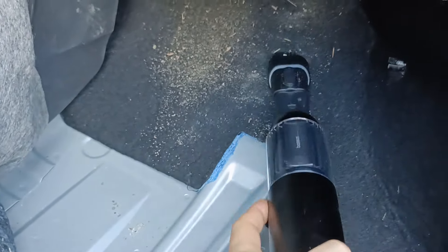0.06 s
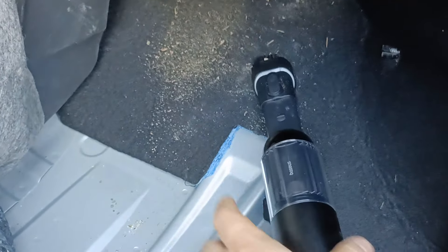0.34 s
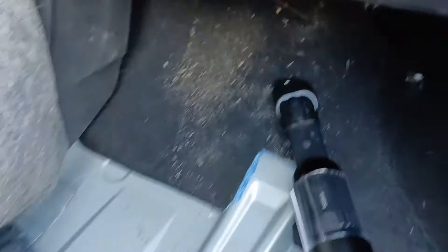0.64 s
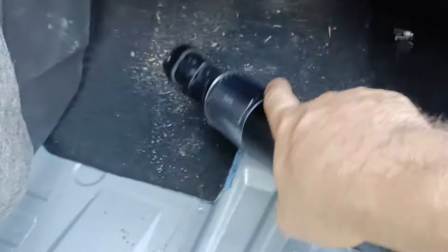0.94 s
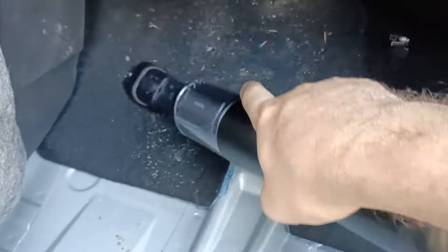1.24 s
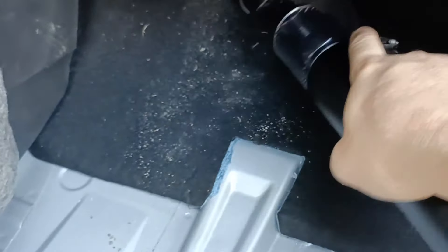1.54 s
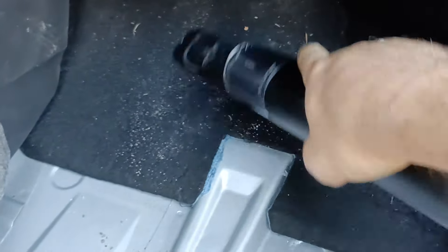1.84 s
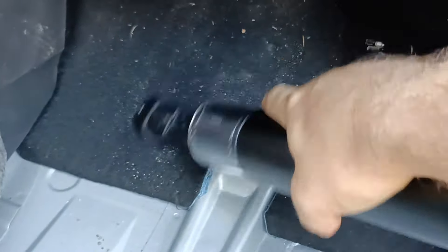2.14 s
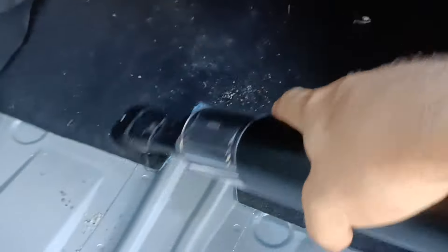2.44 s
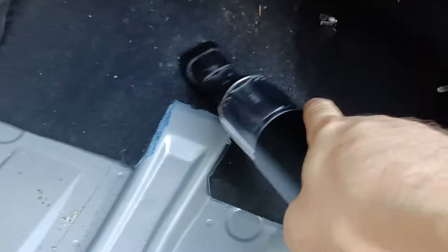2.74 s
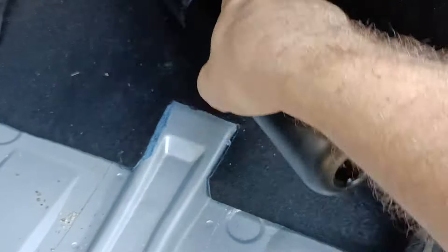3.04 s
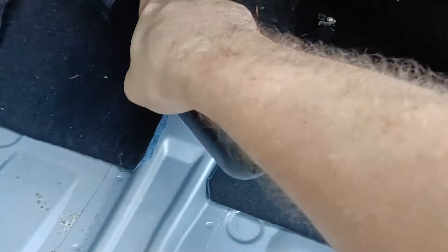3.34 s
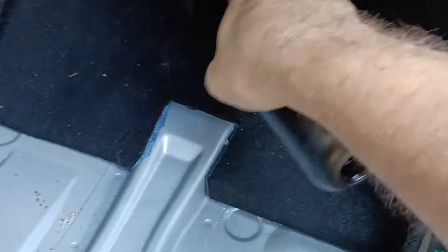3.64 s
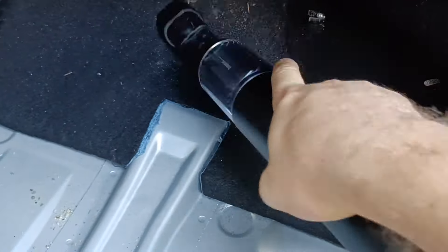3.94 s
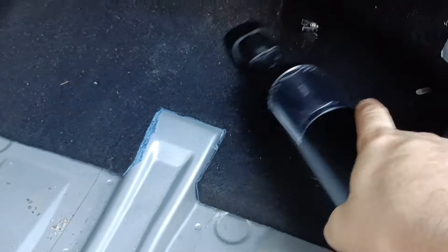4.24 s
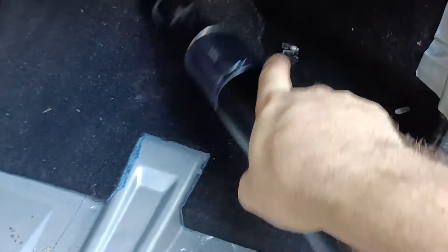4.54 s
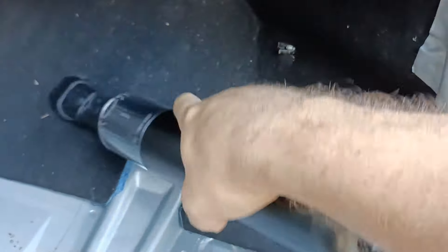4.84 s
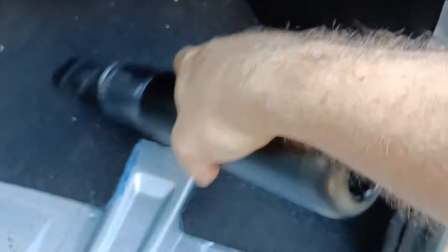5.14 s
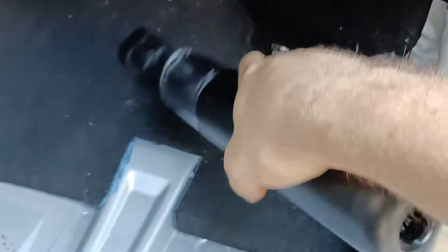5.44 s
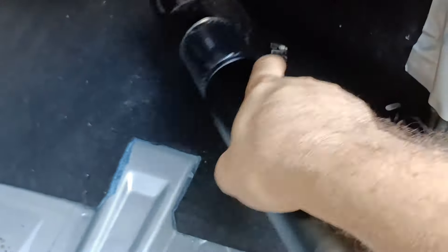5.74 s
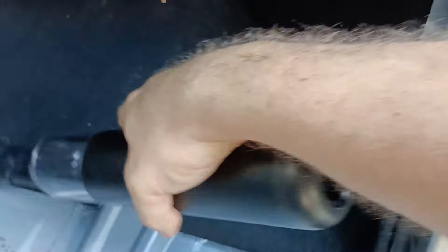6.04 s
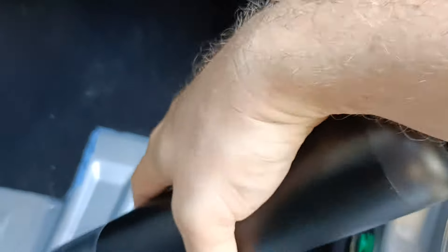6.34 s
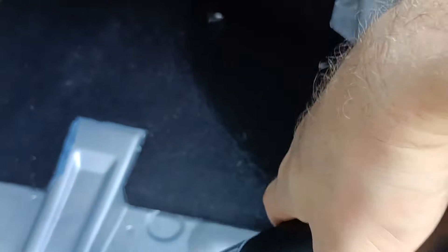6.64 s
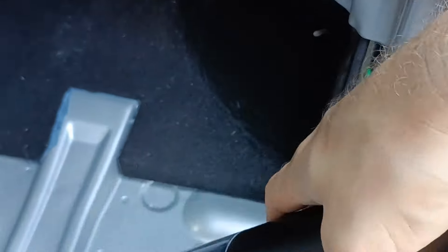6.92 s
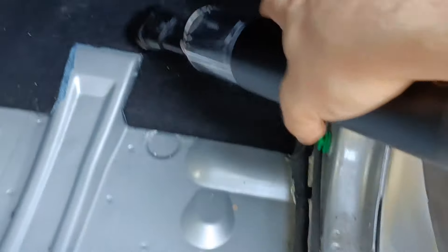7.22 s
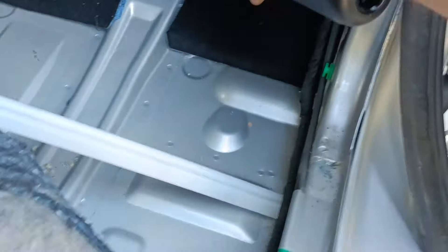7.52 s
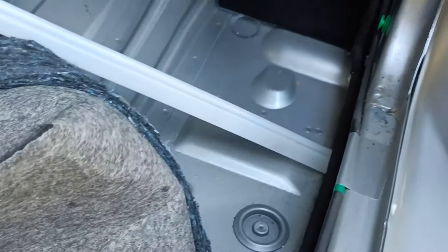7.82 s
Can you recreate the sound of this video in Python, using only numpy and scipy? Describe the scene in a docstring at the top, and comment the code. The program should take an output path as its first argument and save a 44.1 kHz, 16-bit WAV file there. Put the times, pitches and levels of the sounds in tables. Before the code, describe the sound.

Inside a car, a handheld vacuum whines without a break, hissing as its nozzle sweeps the floor carpet. A flurry of sandy ticks and two light bumps come early, and the ticking then thins out. The motor's pitch rises very slightly throughout. Later the plastic body knocks three times against the floor, the whine turns raspier, and the exhaust blows across the close microphone in its strongest gusts and pops.

```python
"""A small cordless vacuum works a car's floor carpet, close to the microphone. From the start its motor whines,
air rushes through the body, hisses at the nozzle and sounds the tube, and the exhaust sweeps the two microphone
ports in puffs and pops. Grit ticks up the tube from a dirty patch, then the nozzle taps the floor twice. The
wind eases through the middle as the whine creeps up in pitch. After five seconds come three harder knocks, the
strongest puffs and pops, and a rougher whine."""
import sys
import numpy as np
from scipy import signal
from scipy.fft import rfft, irfft, next_fast_len
from scipy.io import wavfile
from scipy.ndimage import uniform_filter1d, map_coordinates

SR = 44100
rng = np.random.default_rng(int(sys.argv[2]) if len(sys.argv) > 2 else 0)


def log_audio(samples):
    """Write samples as a 16-bit WAV file to the path given in sys.argv[1]."""
    # one column per channel
    frames = np.atleast_2d(samples).T
    # limit to full scale, then quantise
    limited = np.clip(frames, -1, 1)
    pcm = np.round(limited * 32767).astype(np.int16)
    wavfile.write(sys.argv[1], SR, pcm)


N = 347508
TIME = np.arange(N) / SR


def from_db(db):
    """Decibels to gain."""
    return 10 ** (np.asarray(db) / 20)


def unit_rms(x):
    """Scale to unit power."""
    return x / np.sqrt(np.mean(x ** 2) + 1e-20)


def automation(rows):
    """One curve over time for each column after a table's first."""
    times, *columns = np.transpose(rows)
    return [np.interp(TIME, times, column) for column in columns]


def at_hz(points, hz):
    """Read a spectrum on a log-frequency axis."""
    freqs, values = np.transpose(points)
    return np.interp(np.log(hz + 1), np.log(freqs), values)


def panned(pan_db):
    """Constant-power stereo gains; pan_db is left minus right."""
    gains = from_db(np.array([[.5], [-.5]]) * pan_db)
    return gains / np.sqrt(np.mean(gains ** 2, axis=0))


def filtered(x, hz, kind, order=2):
    """Butterworth filter."""
    sections = signal.butter(order, np.clip(hz, 10, SR / 2 - 1000), kind, fs=SR, output="sos")
    return signal.sosfilt(sections, x)


def drift(rate_hz):
    """Smooth random modulation with a spread of about 1."""
    knots = rng.standard_normal(2048)
    return map_coordinates(knots, [TIME * rate_hz * 2], order=3, mode="wrap")


def ring(clicks, hz, t60_s):
    """Each click sets a decaying sine ringing."""
    decay, step = from_db(-60 / (t60_s * SR)), 2 * np.pi * hz / SR
    return signal.lfilter([0, np.sin(step)], [1, -2 * decay * np.cos(step), decay ** 2], clicks + 1e-18)


def resonant_air(hz, width_hz, shared):
    """Stereo noise in one resonance that follows the curve hz; shared is the gain of a centre layer."""
    white = rng.standard_normal((3, len(hz))) + 1j * rng.standard_normal((3, len(hz)))
    eddies = filtered(filtered(white, width_hz / 2, "low", order=1), 0.6 * width_hz, "low")
    band = np.real(eddies * np.exp(2j * np.pi * np.cumsum(hz) / SR))
    return unit_rms(band[:2] + shared * band[2])


# The motor creeping up in speed: time_s, rotation_hz
MOTOR_SPEED = [(0, 3310), (.15, 3290), (1, 3296), (1.2, 3326), (2.38, 3343), (2.65, 3330), (3.5, 3363),
               (4, 3385), (4.5, 3394), (4.9, 3412), (5.02, 3430), (5.2, 3416), (5.9, 3438), (6.1, 3456),
               (6.25, 3430), (7.4, 3449), (7.88, 3480)]
# The whine's two harmonics as the body turns: time_s, first_db, second_db, pan_db
WHINE_MIX = [(0, -43.5, -43.5, 0), (.22, -42, -35.5, 8), (.3, -40, -41.5, 4), (.9, -36.5, -39.5, 0),
             (1.16, -50, -46, -4), (1.55, -45, -40, 0), (1.66, -43, -47.5, 2), (1.94, -45.5, -35.5, 3.5),
             (2.45, -46, -32, 6), (2.7, -43, -42, 4), (2.96, -42.5, -41.5, 1), (3.24, -52, -44.5, 1),
             (3.7, -48.5, -43, 1), (4.08, -42.5, -42, 4.5), (4.56, -42, -40, 2.5), (4.84, -43.5, -43, 8),
             (5.0, -50, -35, 4), (5.32, -46.5, -33, 1), (5.5, -44.5, -42, 4), (5.88, -40.5, -42, 3.5),
             (6.02, -53, -40, 6), (6.16, -46.5, -42, 4), (6.64, -46.5, -42.5, 3), (7.0, -47, -38.5, -4.5),
             (7.3, -43, -40.5, 0), (7.8, -52, -47, -2)]
# Rasp in the whine, growing as the vacuum is turned at the end: time_s, roughness (0-1)
WHINE_RASP = [(0, .3), (5.9, .55), (6.9, .75)]
def motor_whine(first_db, second_db, jitter_hz, waver_db, churn_width_hz, sway_rad):
    """Two harmonics of the rotor; churning air smears part of each into a rough band."""
    first, second, pan = automation(WHINE_MIX)
    hz, = automation(MOTOR_SPEED)
    rough, = automation(WHINE_RASP)
    rotor_phase = 2 * np.pi * np.cumsum(hz + jitter_hz * drift(25)) / SR
    out = np.zeros((2, N))
    for harmonic, level in ((1, first + first_db), (2, second + second_db)):
        churn = resonant_air(harmonic * hz, churn_width_hz, shared=.5) / np.sqrt(2)
        for side in range(2):
            sway = sway_rad * drift(1.287)  # the moving hand changes the path to each microphone
            tone = np.sqrt(1 - rough ** 2) * np.sin(harmonic * rotor_phase + sway) + rough * churn[side]
            out[side] += from_db(level + np.sqrt(harmonic) * waver_db * drift(11)) * tone
    return out * panned(pan)


# How alike the air is on both sides: frequency_hz, correlation (0-1)
AIR_CORRELATION = [(60, 1), (650, 1), (1400, 0.9), (2400, 0.79), (4400, 0.3), (7500, 0.77), (10000, 0)]
# Where each band of the air sits: frequency_hz, pan_db
AIR_PAN = [(500, 0.5), (2000, 0), (3000, 2), (4200, 2), (5200, 6.5), (6300, 8.5), (8000, 6), (10000, 5)]
def turbulence(spectrum):
    """Coloured air noise at two microphones: mono in the bass, wide at the top."""
    size = next_fast_len(N)
    hz = np.arange(size // 2 + 1) * SR / size
    mid, side = rfft(rng.standard_normal((2, size)))
    alike = np.clip(at_hz(AIR_CORRELATION, hz), -1, 1)
    pair = np.sqrt(1 + alike) * mid + np.sqrt(1 - alike) * side * [[1], [-1]]
    coloured = pair * from_db(at_hz(spectrum, hz)) * panned(at_hz(AIR_PAN, hz))
    return unit_rms(irfft(coloured, size)[:, :N])


# Fader rides for the air through the body: time_s, hiss_db, spray_db, pan_db
AIR_MIX = [(0.0, -43, -40.5, 0), (0.33, -43.5, -40.5, -2), (0.81, -42, -42, 3.5), (1.12, -39.5, -42, 1.5),
           (2.7, -42.5, -42, 2), (4.83, -42.5, -43, 3.5), (5.44, -42.5, -41, 4.5), (6.08, -40, -43, 4.5),
           (6.12, -42, -38.5, 3.5), (7.16, -39, -39.5, 0), (7.79, -44.5, -41.5, 3.5)]
# Tone curves of the dull rush, bright hiss and fine spray: frequency_hz, gain_db
RUSH_EQ = [(80, -15.5), (190, -4), (310, -9), (650, 2), (1000, 2.5), (1400, 2), (1900, -4), (2500, 0),
           (3200, -4), (5000, -23)]
HISS_EQ = [(1900, -50), (2500, -9), (3000, 2.5), (3350, 3), (3800, 1), (4400, -2), (5100, 0.8), (5800, 0),
           (6600, 3.5), (8000, -5.5), (10000, -40)]
SPRAY_EQ = [(6000, -30), (8300, 6.5), (10000, 3), (11700, 5), (12800, 3), (14000, 2.5), (15800, 0.5)]
def airflow(rush_db, hiss_db, spray_db, flutter_db, rush_follows_spray, housing_pan_db):
    """A dull rush from the exhaust, hiss from the fan housing and fine spray from the carpet pile."""
    hiss_ride, spray_ride, pan = automation(AIR_MIX)
    rush_ride = rush_follows_spray * (spray_ride - spray_ride.mean())
    rush = from_db(rush_ride + rush_db) * turbulence(RUSH_EQ)
    hiss = from_db(hiss_ride + hiss_db + flutter_db * drift(22)) * turbulence(HISS_EQ)
    spray = from_db(spray_ride + spray_db + flutter_db * drift(20)) * turbulence(SPRAY_EQ)
    treble = hiss + spray
    left_lag_s = 0.01 * (np.median(pan) - pan)  # moving right, it reaches the left microphone later
    treble[0] = map_coordinates(treble[0], [(TIME - left_lag_s) * SR], order=3)
    return rush + treble * panned(pan + housing_pan_db)


# The hissing gap between nozzle and carpet: time_s, pitch_hz, level_db, pan_db
NOZZLE_GAP = [(0, 7100, -39, 1), (.45, 7300, -39, 1), (.63, 7780, -31, 1), (.88, 7200, -35, 4),
              (.98, 7300, -45, -2), (1.75, 7500, -40.5, 5.5), (2.33, 7050, -36.5, -0.5),
              (2.6, 7200, -47, 0), (2.88, 7500, -38.5, 6), (3.3, 7300, -42.5, -2), (3.6, 7050, -38.5, 0),
              (3.8, 7500, -41, 5), (4.75, 7500, -42.5, 5), (5.0, 7150, -38, 5.5), (5.3, 7100, -35.5, 0),
              (5.45, 7200, -39.5, 0), (5.56, 7300, -34.5, 0), (5.7, 7500, -41.5, 3.5),
              (6.15, 7100, -39.5, 8), (7, 7400, -45.5, -3), (7.3, 7200, -44, 3), (7.52, 6600, -37, 10),
              (7.88, 7694, -42, 0)]
def nozzle_hiss(gain_db, width_hz, shared, flutter_db, rocking_hz):
    """Air tearing past the lip sounds a broad resonance that moves with the gap and flutters on the pile."""
    hz, level, pan = automation(NOZZLE_GAP)
    hz = hz + rocking_hz * drift(3)
    envelope = from_db(level + gain_db + flutter_db * drift(14))
    return envelope * resonant_air(hz, width_hz, shared) * panned(pan)


# Airy resonances of the intake tube: pitch_hz, width_hz, level_db
TUBE_MODES = [(5260, 1100, -1.5), (7595, 500, -3.5), (9628, 800, -10.5), (12800, 450, -7.5)]
# Their fader ride, stroke by stroke: time_s, level_db
TUBE_STROKES = [(0, -52), (.9, -50), (1.1, -44.5), (1.45, -46), (1.65, -48), (2.2, -44.5), (2.5, -43.5),
                (2.95, -41.5), (3.1, -55), (3.65, -50), (3.9, -42.5), (5.0, -42.5), (5.45, -46.5),
                (5.8, -44), (6.05, -43), (6.25, -58)]
def intake_tube(gain_db, shared, pan_db, flutter_db, follows_gap):
    """Freely drawn air sounds the tube's resonances; the gap at the lip bends their pitch."""
    level, = automation(TUBE_STROKES)
    gap_hz = automation(NOZZLE_GAP)[0]
    bend = (gap_hz / np.median(gap_hz)) ** follows_gap
    modes = sum(from_db(db + flutter_db * drift(6)) * resonant_air(hz * bend, width_hz, shared)
                for hz, width_hz, db in TUBE_MODES)
    return from_db(level + gain_db) * modes * panned(pan_db)


def grit(base_per_s, level_db, spread_db, t60_s, pitch_count=12):
    """Sand ticks on the tube, most thickly while the nozzle crosses the dirty patch at the start."""
    dirty_patch = np.exp(-((TIME - .65) / 0.21) ** 2)
    hits = rng.random(N) < base_per_s * (1 + 9 * dirty_patch) / SR
    grains = hits * from_db(level_db + spread_db * np.minimum(rng.exponential(1, N), 2.8))
    pitch_index = rng.integers(0, pitch_count, N)
    ticks = sum(ring(grains * (pitch_index == k), hz, t60_s) * panned(rng.normal(1, 3.6))
                for k, hz in enumerate(np.geomspace(5000, 14500, pitch_count)))
    return filtered(ticks, 3600, "high")


# A bed of exhaust wind, strong while the vacuum is held close: time_s, level_db
EXHAUST_DRAUGHT = [(0, -52), (.65, -55), (1.2, -59), (2.4, -62), (3.6, -68), (5.9, -67), (6.55, -47),
                   (7.1, -54), (7.6, -47)]
# The jet hitting the microphone: start_s, hold_s, level_db, pan_db
JET_PUFFS = [(0.038, 0.0044, -35, 7), (0.12, .015, -47, -7), (0.236, 0.08, -41, -3),
             (0.373, 0.0165, -38, -4), (0.489, 0.065, -44, 12), (0.77, 0.025, -41, -24),
             (1.029, .008, -46, -10), (1.35, 0.071, -38, -28), (1.465, 0.071, -43.5, -5),
             (1.809, 0.26, -47, -17.5), (2.908, 0.13, -56.5, -14), (3.106, .008, -53, -15),
             (4.4, 0.029, -69, -11.5), (4.646, 0.018, -47, -24), (4.92, 0.12, -51, -19),
             (5.281, 0.0071, -39, -2), (5.68, 0.12, -50, 24), (6.021, 0.16, -37, 22.5),
             (6.249, 0.12, -35, -15), (6.447, 0.048, -28.5, -21), (6.691, 0.038, -26.5, -21),
             (6.76, 0.023, -30, -19), (6.863, 0.014, -43.5, -2), (7.323, 0.039, -32.5, -20),
             (7.463, 0.009, -31.5, -14), (7.496, 0.072, -35, -20.5), (7.761, 0.012, -34, -23),
             (7.836, .03, -42.5, -8)]
def exhaust_wind(gain_db, low_hz, top_hz, edge_db, lumpy_db, gusty_db, pan_db, attack_s, release_s):
    """Eddies buffet each port on their own; a harder puff breaks into smaller, brighter eddies."""
    draught, = automation(EXHAUST_DRAUGHT)
    power = (from_db(draught + gusty_db * np.tanh(drift(7))) * panned(pan_db)) ** 2
    for start_s, hold_s, db, pan in JET_PUFFS:
        near = (TIME > start_s) & (TIME < start_s + .5)
        age = TIME[near] - start_s
        swell = np.minimum(age / attack_s, 1) * np.exp(-np.maximum(age - hold_s, 0) / release_s)
        power[:, near] += (from_db(db) * panned(pan) * swell) ** 2
    blow = np.sqrt(power)
    lumps = from_db(lumpy_db * np.array([[drift(60), drift(60)], [drift(51), drift(60)]]))
    large, small = filtered(rng.standard_normal((2, 2, N)) * lumps, low_hz, "high")
    thud = unit_rms(filtered(filtered(large, top_hz, "low", order=1), 424, "low"))
    edge = unit_rms(filtered(small, [400, 900], "band"))
    eddies = thud + from_db(edge_db) * (blow / blow.max()) ** 0.72 * edge
    eddies /= np.sqrt(uniform_filter1d(eddies ** 2, size=SR // 25, axis=1))  # blow alone sets the dynamics
    return from_db(gain_db) * blow * eddies


# Sharp wind pops on the microphone: start_s, level_db, pitch_hz, pan_db
EDDY_POPS = [(0.043, -34, 320, 8), (0.382, -35, 280, -14), (0.535, -33.5, 240, 23), (0.954, -39.5, 300, -4),
             (1.361, -33, 340, -22), (1.471, -31, 241, -23), (5.287, -36.5, 280, 0), (6.093, -34, 400, 19),
             (6.14, -27.5, 450, 21.5), (6.297, -32, 332, -19.5), (6.457, -21, 272, -19),
             (6.485, -34.5, 240, -11), (6.691, -29, 357, -15), (6.704, -20.5, 570, -28),
             (6.718, -33, 400, -20), (6.734, -30, 200, -26), (6.771, -24.5, 220, -22),
             (7.33, -34, 280, -16), (7.467, -29, 377, -7), (7.77, -31, 395, -21)]
def wind_pops(gain_db, rise_s, snap_db, snap_hz):
    """A single eddy bursts on a port: a swing or two of pressure with a short snap on top."""
    out = np.zeros((2, N))
    for start_s, db, hz, pan in EDDY_POPS:
        near = (TIME > start_s) & (TIME < start_s + .05)
        age = TIME[near] - start_s
        swell = age / rise_s * np.exp(1 - age / rise_s)
        thump = swell * np.sin(2 * np.pi * hz * age)
        noise = unit_rms(filtered(rng.standard_normal(len(age)), [snap_hz / 2, snap_hz], "band", order=1))
        snap = from_db(snap_db) * swell ** 2 * filtered(noise, snap_hz, "low")
        out[:, near] += from_db(db + gain_db) * (thump + snap) * panned(pan)
    return filtered(out, 74, "high")


# Passing swishes of air, and a faint low cabin hum that swells and fades:
# middle_s, length_s, pitch_hz, glide_either_side_hz, width_hz, level_db, pan_db
SWISHES_AND_HUM = [(0.11, 0.16, 5020, 400, 1300, -42.5, 4.5), (0.483, 0.65, 10000, -0.5, 3200, -42.5, -20),
                   (0.551, 0.88, 1950, 0, 1200, -53.5, 0), (.66, 0.22, 8260, 249, 2000, -47.5, 8),
                   (0.857, 0.11, 9700, -2, 2000, -42.5, 12), (1.3, 2.26, 214.8, 0, 50, -62.5, -5),
                   (2.1, 1.8, 8800, -0.5, 1400, -59, -21), (2.3, 1.2, 1903, 0, 900, -57, 1),
                   (3.136, 0.18, 6780, 448.5, 650, -41.5, 6), (3.45, 0.85, 4470, -1, 2330, -45, 1),
                   (4.35, 0.55, 1660, 0.5, 500, -54.5, -0.5), (6.9, 0.7, 5006, -1, 1090, -47, 0),
                   (6.864, 0.89, 12700, 0, 2400, -48, -5), (6.967, .16, 9250, 0.5, 2600, -44, 7),
                   (7.708, 0.2, 7500, 500.5, 400, -41, 1.5)]
def swishes_and_hum(gain_db, shared):
    """Air swishes on edges and pile, sometimes gliding upwards; the one low resonance is the cabin's hum."""
    out = np.zeros((2, N))
    for middle_s, length_s, hz, glide_hz, width_hz, db, pan in SWISHES_AND_HUM:
        middle = int(middle_s * SR)
        near = np.arange(max(0, middle - SR), min(N, middle + SR))
        progress = 2 * (TIME[near] - middle_s) / length_s
        swell = from_db(db + gain_db) * np.exp(-progress ** 2)
        band = resonant_air(hz + glide_hz * np.tanh(progress), width_hz, shared)
        out[:, near] += swell * band * panned(pan)
    return out


# Plastic knocking on the floor: start_s, level_db, brightness_hz, pan_db
FLOOR_KNOCKS = [(0.8815, -33, 700, 0), (0.918, -31, 1200, 0), (5.167, -20, 1000, -1),
                (6.1674, -20, 7000, 4), (6.317, -19, 7000, 3)]
# The chatter within one knock: delay_s, strength
KNOCK_CHATTER = [(0, 0.82), (.0011, 0.88), (.0023, .6), (.0046, 0.43)]
# The short, dry ring of the body: pitch_hz, level_db, t60_s
BODY_MODES = [(900, 1.5, 0.0038), (1550, -1, 0.006), (2170, 5, 0.01), (3450, 14, 0.0034),
              (7150, 10, 0.0088), (9700, 6, .004), (12400, 10.5, .004)]
def body_knocks(gain_db):
    """The nozzle or body hits the floor and rebounds for a few milliseconds, ringing its plastic shell."""
    out = np.zeros((2, N))
    for start_s, db, bright_hz, pan in FLOOR_KNOCKS:
        contact = np.zeros(N)
        for delay_s, strength in KNOCK_CHATTER:
            contact[int((start_s + delay_s) * SR)] += strength
        contact = filtered(contact + 1e-18, bright_hz, "low", order=1)
        shell = sum(from_db(mode_db) * ring(contact, hz, t60_s) for hz, mode_db, t60_s in BODY_MODES)
        knock = filtered(shell, bright_hz / 2, "high", order=1)
        out += from_db(db + gain_db) * knock / np.abs(knock).max() * panned(pan)
    return filtered(out, 620, "high")


def footwell(x, echo_db, above_hz, shortest_s, longest_s, sway_s, sway_hz, count=6):
    """Hard trim nearby reflects the treble; the paths change as the hand moves, so the colour swirls."""
    out, bright = x.copy(), filtered(x, above_hz, "high")
    for path_s in np.geomspace(shortest_s, longest_s, count):
        moving_s = path_s * (1 + .2 * drift(.35)) + sway_s * drift(sway_hz)
        for side in range(2):
            delay_s = moving_s + .5 * sway_s * drift(sway_hz)  # each microphone sits a little differently
            out[side] += from_db(echo_db) * map_coordinates(bright[side], [(TIME - delay_s) * SR], order=3)
    return out


def scene():
    """The vacuum in the footwell, and its wind on the microphone."""
    whine = motor_whine(first_db=-1.0, second_db=-2.0, jitter_hz=4.0, waver_db=2.2,
                        churn_width_hz=220, sway_rad=.9)
    air = airflow(rush_db=-48.0, hiss_db=2.5, spray_db=3.0, flutter_db=1.5,
                  rush_follows_spray=0.66, housing_pan_db=-5)
    air += nozzle_hiss(gain_db=-1.5, width_hz=1310, shared=0.72, flutter_db=3.0, rocking_hz=69.46)
    air += intake_tube(gain_db=-0.55, shared=1.0, pan_db=6, flutter_db=1.6, follows_gap=.7)
    ticks = grit(base_per_s=130, level_db=-45.0, spread_db=4.0, t60_s=0.011)
    wind = exhaust_wind(gain_db=-1.0, low_hz=139, top_hz=280, edge_db=-8.0, lumpy_db=4.5,
                        gusty_db=7.5, pan_db=-2.5, attack_s=0.0053, release_s=0.02)
    pops = wind_pops(gain_db=1.0, rise_s=.002, snap_db=-8, snap_hz=1600)
    air += swishes_and_hum(gain_db=3.0, shared=1.0)
    knocks = body_knocks(gain_db=2.0)
    air = footwell(air, echo_db=-14, above_hz=4200, shortest_s=.0005, longest_s=.0021,
                   sway_s=.000035, sway_hz=2.0)
    return whine + air + ticks + wind + pops + knocks


def record(dry):
    """Roll off the deep bass and cut the very top."""
    top_cut = signal.firwin(401, 15750, fs=SR)
    return signal.fftconvolve(filtered(dry, 81, "high"), top_cut[None], "same", axes=1)


dry = scene()
out = record(dry)
log_audio(out)
```